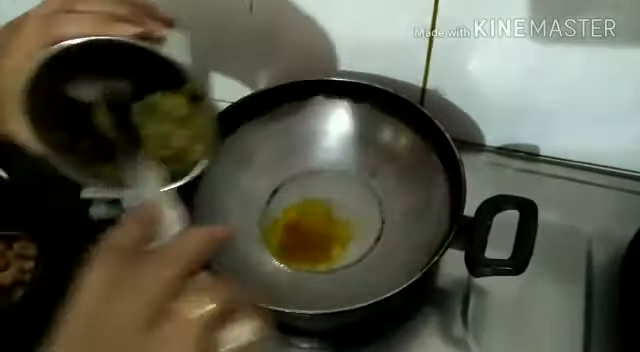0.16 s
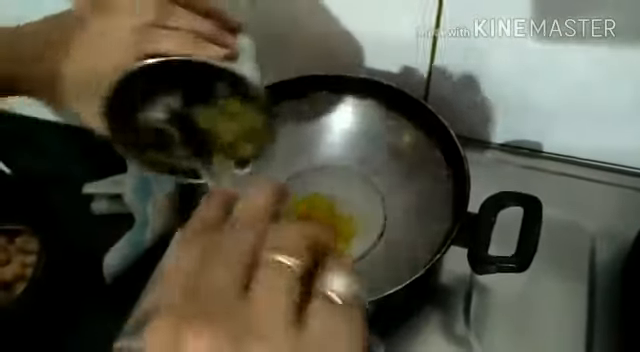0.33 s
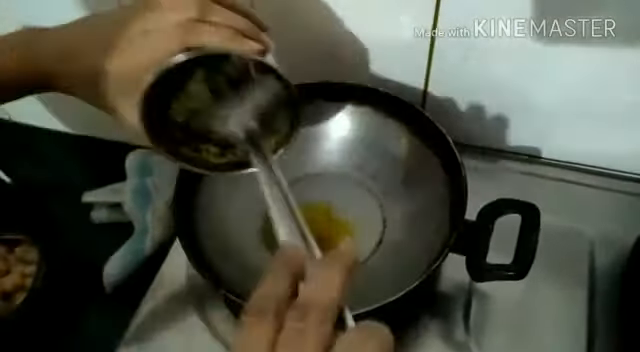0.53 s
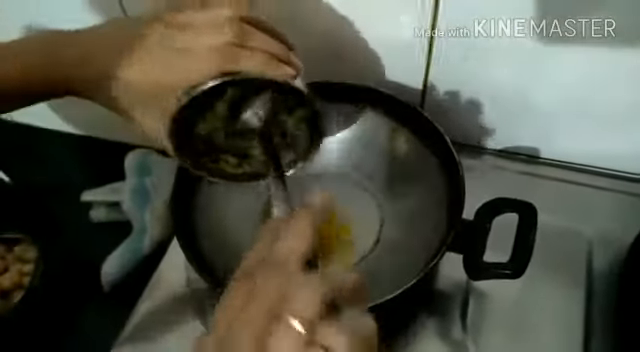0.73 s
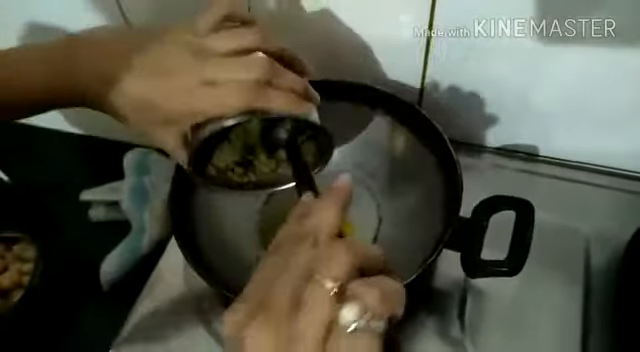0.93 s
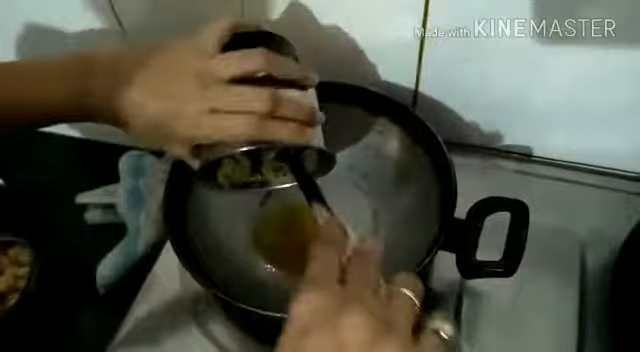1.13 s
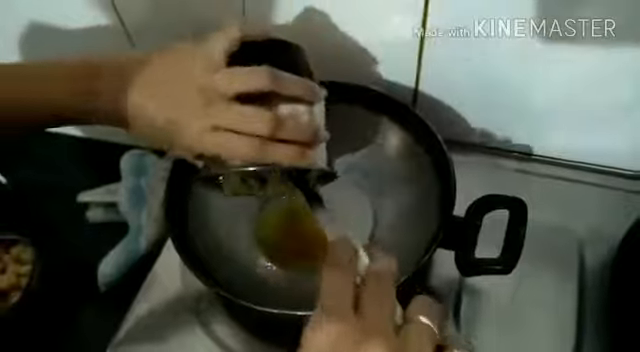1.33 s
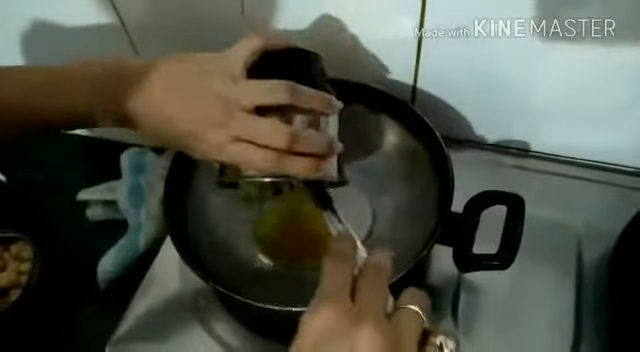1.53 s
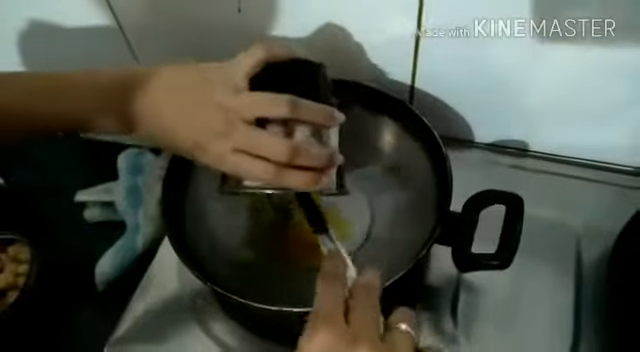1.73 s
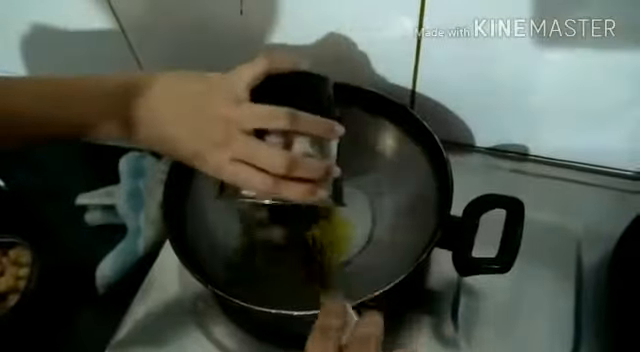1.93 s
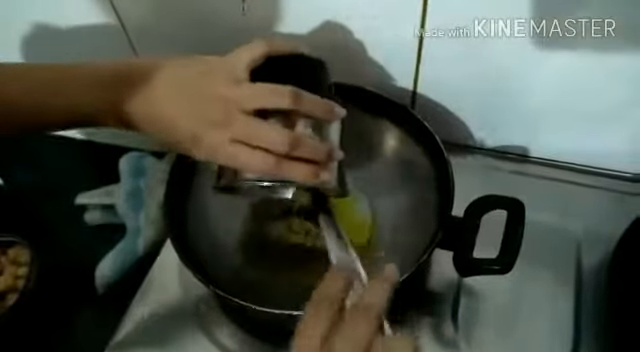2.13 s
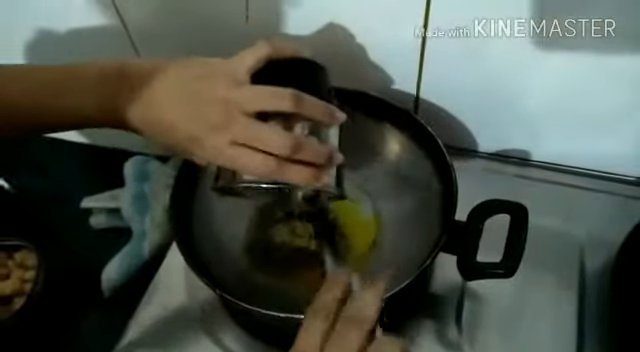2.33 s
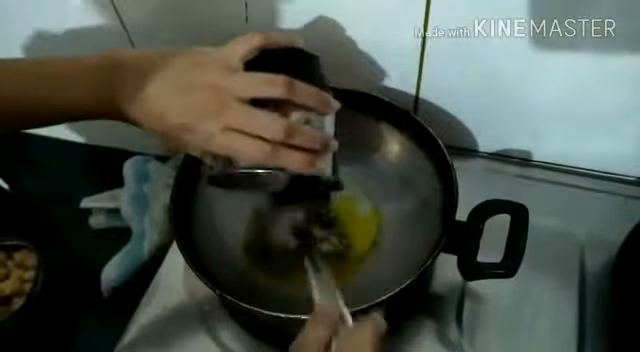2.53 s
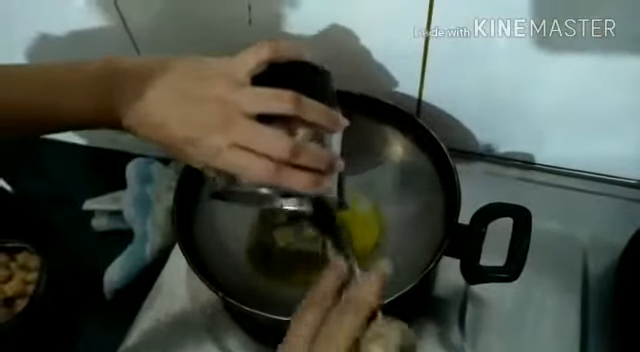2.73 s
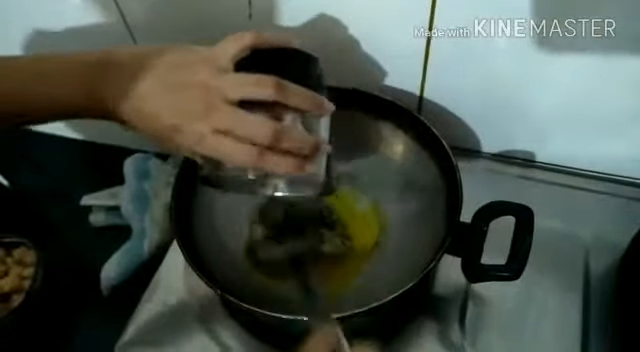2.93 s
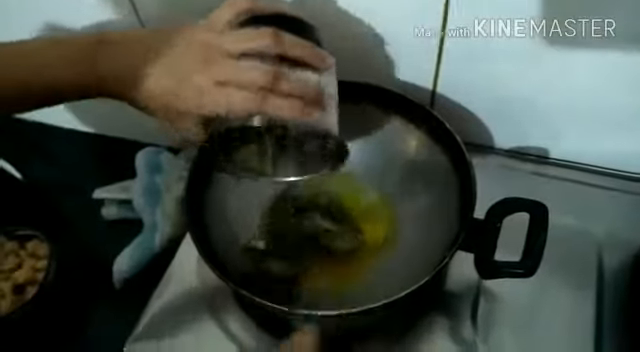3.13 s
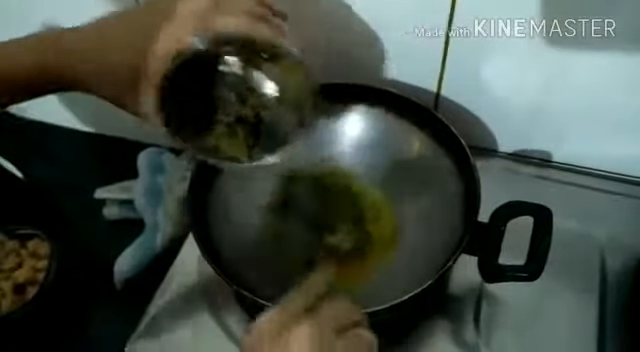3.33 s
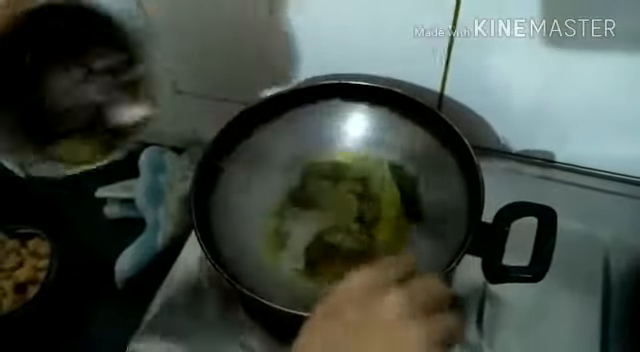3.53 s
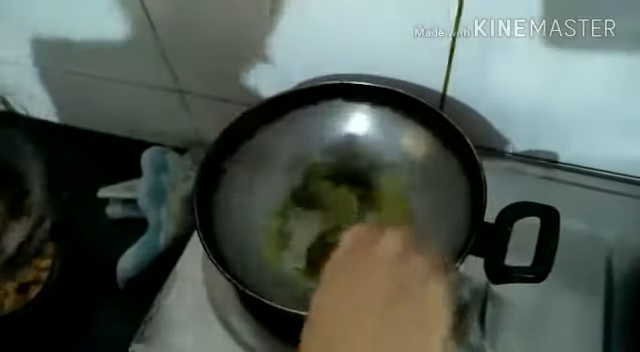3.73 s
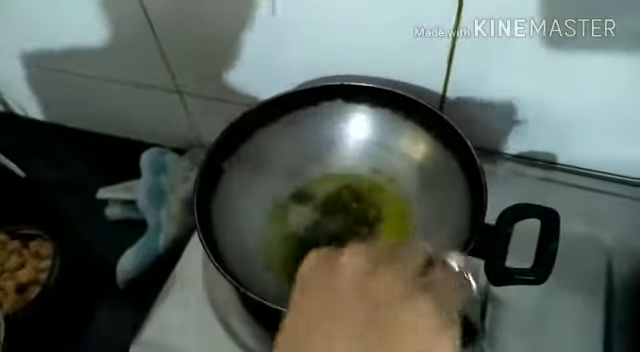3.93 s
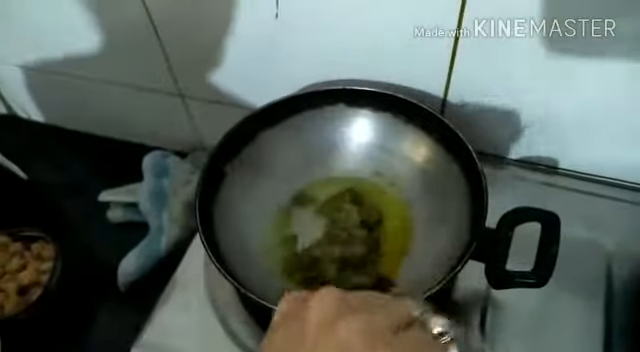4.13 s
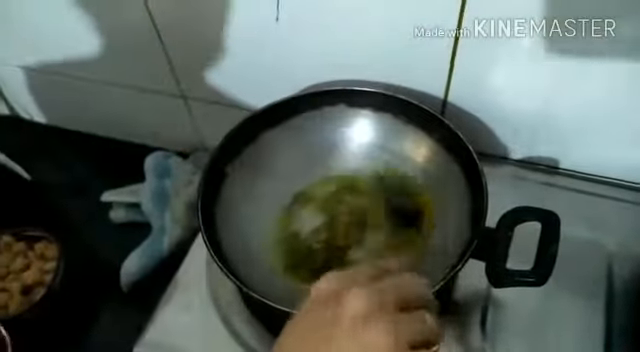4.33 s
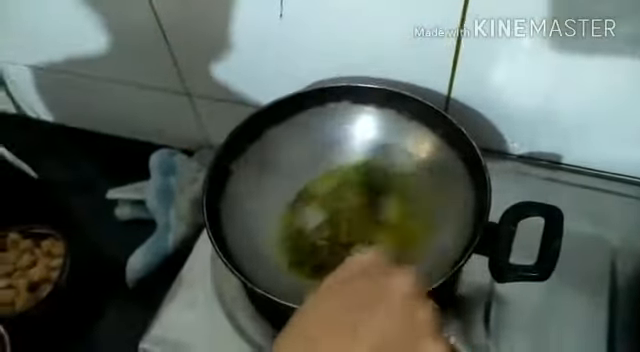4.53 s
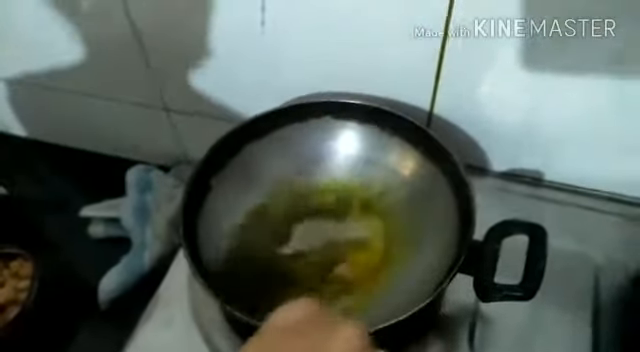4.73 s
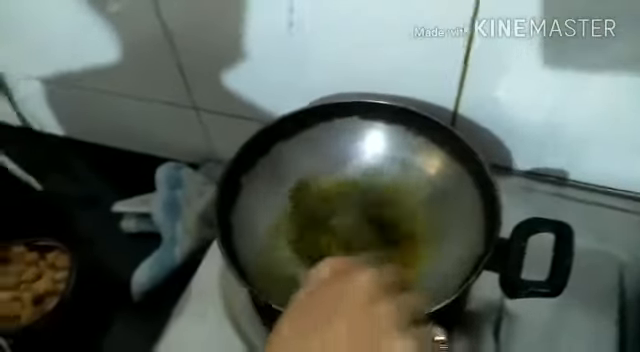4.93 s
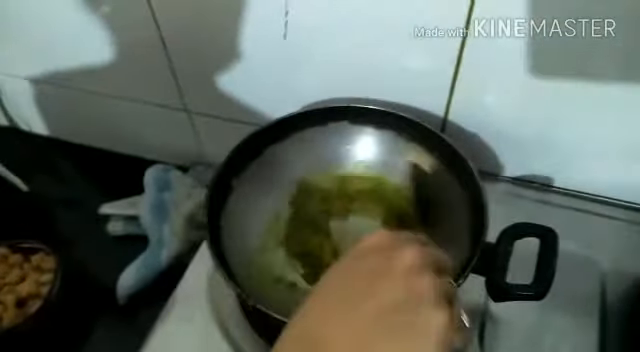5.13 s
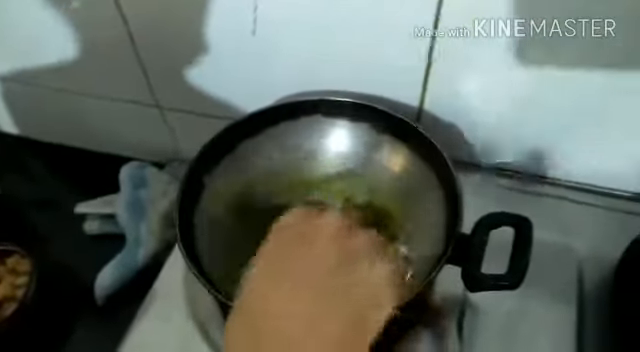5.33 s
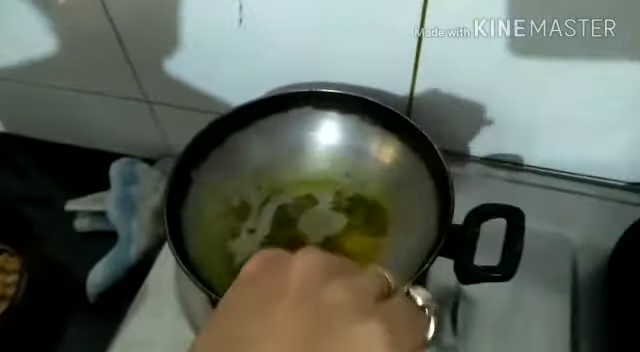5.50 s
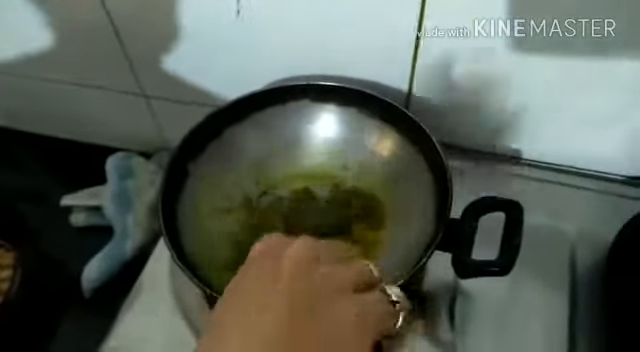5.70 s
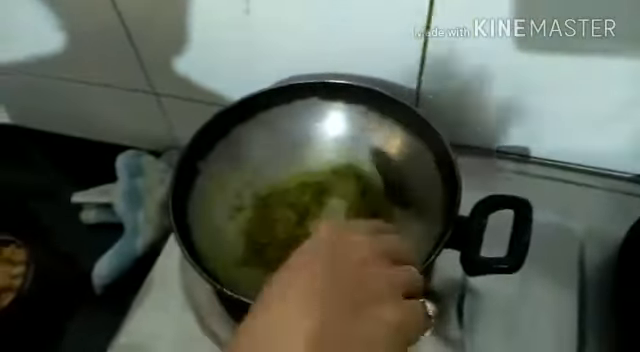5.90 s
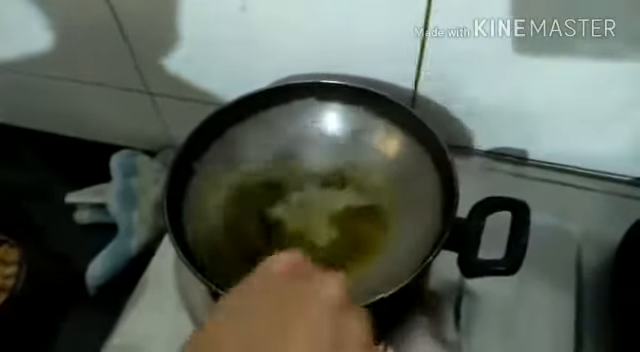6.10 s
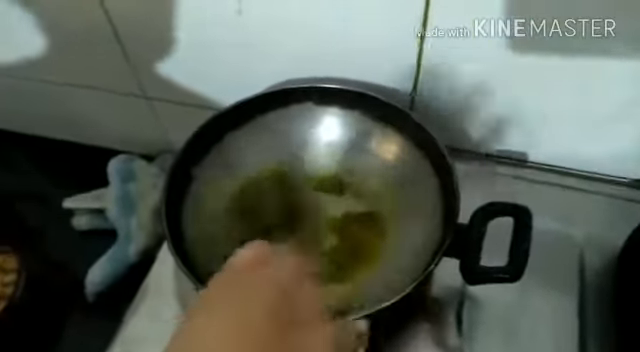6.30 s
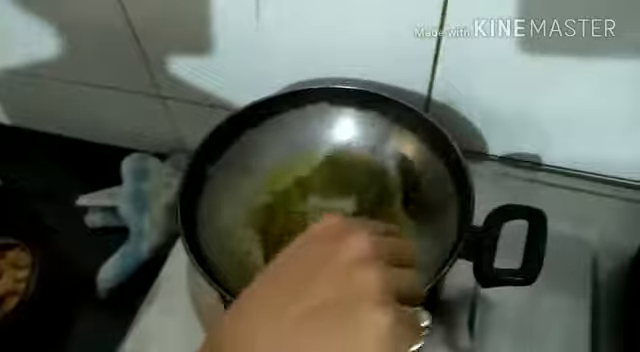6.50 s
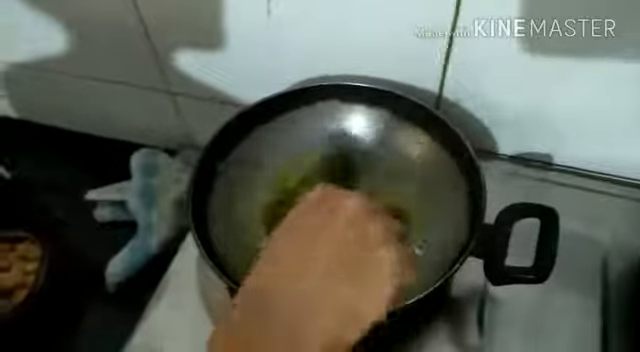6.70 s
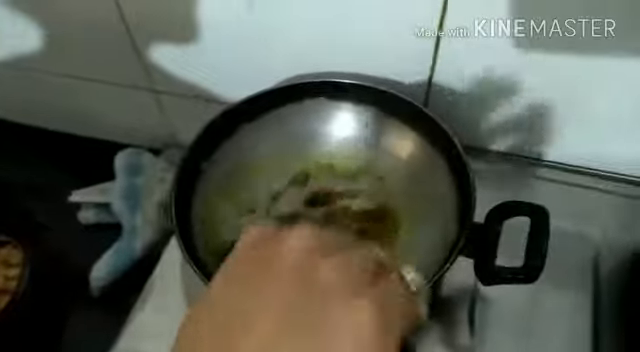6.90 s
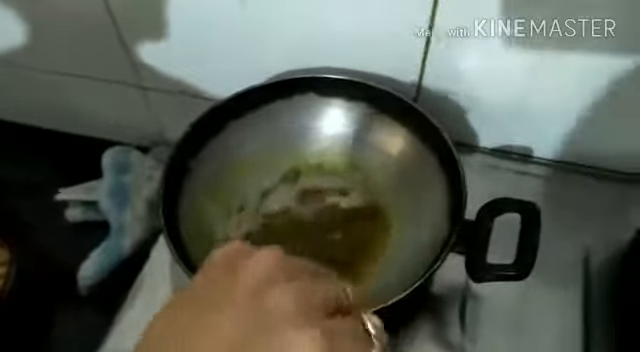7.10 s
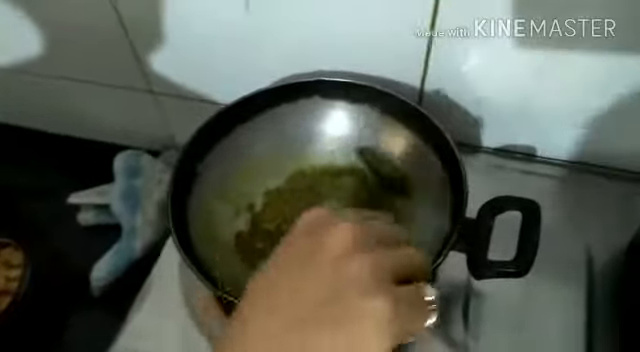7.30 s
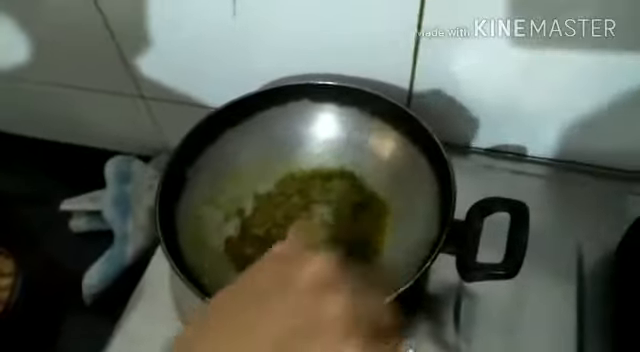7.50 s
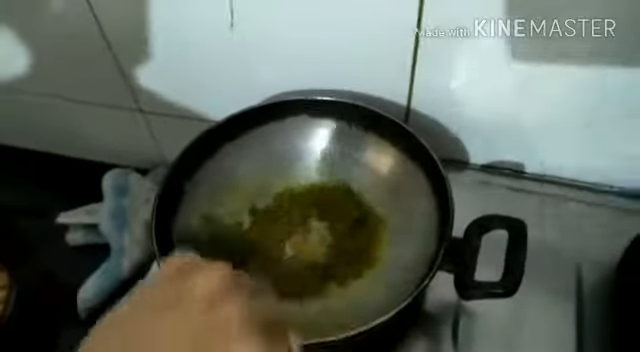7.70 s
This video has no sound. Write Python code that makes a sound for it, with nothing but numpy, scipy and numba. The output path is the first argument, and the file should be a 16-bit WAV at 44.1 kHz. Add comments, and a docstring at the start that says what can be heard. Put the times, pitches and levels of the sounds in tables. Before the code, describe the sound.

In a small tiled kitchen, a spoon squeaks, scrapes and clacks inside a steel cup, with one very loud knock early on. After about two seconds wet paste lands in hot oil and a dense, spitting sizzle starts and stays. Short stirring rubs and hard spoon knocks on the pan run through it. Close phone microphone, mono, with loudness ducking after the hardest blows.

```python
"""First a dull low thud and a soft scrape, then a spoon knocking paste out of a steel cup in a home kitchen.
From about 2 s the wet paste sizzles in hot oil: thousands of random clicks stand for bursting steam bubbles.
Spoon strokes rub along the pan (filtered clicks); knocks are short fading waves, noise and ringing steel modes.
Thuds and air on a phone's single microphone are shaped noise; tiled walls give the knocks a short tail.
The phone's limiter ducks after loud knocks."""
import sys
import numpy as np
from scipy import signal
from scipy.fft import rfft, irfft, next_fast_len
from scipy.io import wavfile
from scipy.ndimage import uniform_filter1d
from numba import njit

SR = 44100
rng = np.random.default_rng(int(sys.argv[2]) if len(sys.argv) > 2 else 0)


def unload_wav(signal):
    """Save mono or channel-first audio to the path in sys.argv[1] as 16-bit WAV at rate SR, clipped to [-1, 1]."""
    wavfile.write(
        sys.argv[1],
        SR,
        np.round(np.clip(np.atleast_2d(signal).T, -1, 1) * 32767).astype(np.int16),
    )


N = 341775  # length in samples


def undb(db):
    """Turns decibels into an amplitude factor."""
    return 10 ** (np.asarray(db) / 20)


def unit(x):
    """Scales x to an rms of 1."""
    return x / np.sqrt(np.mean(x ** 2))


def curves(table):
    """Joins the rows of a table by straight lines: one value per sample for each column after t/s."""
    s, *columns = np.transpose(table)
    return [np.interp(np.arange(N) / SR, s, column) for column in columns]


def colour(x, spectrum):
    """Filters x through points of (f/Hz, level/dB), then sets its rms to 1."""
    hz, db = np.transpose(spectrum)
    size = next_fast_len(N)
    log_hz = np.log(np.arange(size // 2 + 1) * SR / size + 1)
    gain = undb(np.interp(log_hz, np.log(hz), db, -90, -90))
    return unit(irfft(rfft(x, size) * gain, size)[:N])


def walk(rate):
    """A smooth random wander with a spread near 1: random steps, `rate` per second, smoothed twice."""
    hold = int(SR / rate)
    steps = np.repeat(rng.standard_normal(N // hold + 1), hold)
    return 1.3 * uniform_filter1d(uniform_filter1d(steps, hold), hold)[:N]


def bursts(rate, spread_db):
    """Clicks at random moments, `rate` per second, a few much larger than the rest; rms 1."""
    when, size, sign = rng.random((int(rate * N / SR), 3)).T
    clicks = undb(-spread_db * np.log(1 - .98 * size)) * np.sign(sign - .5)
    return unit(np.bincount((when * N).astype(int), clicks, N))


def ring(x, hz, t60):
    """One ringing tone driven by x; it falls 60 dB in t60 seconds, and a click of 1 starts it near level 1."""
    r, w = np.exp(-np.log(1000) / (t60 * SR)), 2 * np.pi * hz / SR
    return signal.lfilter([0, r * np.sin(w)], [1, -2 * r * np.cos(w), r * r], x)


def body(x, modes):
    """All the ringing tones of an object, driven together by x."""
    return sum(undb(db) * ring(x, hz, t60) for hz, db, t60 in modes)


def swells(times, lengths, levels_db, attack_s, fade_db_s):
    """Loudness curve: each event rises, holds until its length is over and fades steadily; powers add up."""
    power = np.zeros(N)
    for s, length, db in zip(times, lengths, levels_db):
        i = int(s * SR)
        t = np.arange(min(N - i, int((length + 50 / fade_db_s) * SR))) / SR
        faded_db = db - fade_db_s * np.clip(t - length, 0, None)
        power[i:i + len(t)] += np.clip(t / attack_s, 0, 1) * undb(2 * faded_db)
    return np.sqrt(power)


WAVER_S = 0.0004  # typical time shift


def drift(x):
    """Reads x a little early or late, so that all its pitches waver together."""
    n = np.arange(len(x))
    return np.interp(n + WAVER_S * SR * walk(25)[:len(x)], n, x)


# Tone of the steady background noise: [f/Hz, level/dB]
QUIET_TONE = [(88, -55), (150, 3), (894, -42), (1150, -1), (1510, -6), (1870, -24), (2270, -19),
              (13000, -20), (15500, -40)]
QUIET_DB = -63


def quiet_noise():
    """A steady faint noise lies under everything: random samples with a fixed tone colour."""
    return undb(QUIET_DB) * colour(rng.standard_normal(N), QUIET_TONE)


HUM_HZ, HUM_DB, HUM_T60_S = 270, -70, 0.44


def room_hum():
    """Noise keeps one resonance ringing: a faint, unsteady tone of the room."""
    return undb(HUM_DB) * unit(ring(rng.standard_normal(N), HUM_HZ, HUM_T60_S))


# Gusts of air on the microphone port: [t/s, length/s, level/dB]
GUSTS = [(0.108, 0.2, -40), (5.214, 0.3, -20), (6.18, 0.087, -54), (6.85, 0.25, -65), (7.254, 0.59, -51)]
# Tone of the moving air: [f/Hz, level/dB]
AIR_TONE = [(8.8, -30), (20, 6), (45, -22), (70, 1), (91, -7), (150, -120)]
GUST_ATTACK_S, GUST_FADE_DB_S, STILL_AIR_DB = 0.041, 40, -71


def air_on_microphone():
    """Air pushes unevenly on the microphone port: deep noise that swells with each gust."""
    gusts = swells(*np.transpose(GUSTS), GUST_ATTACK_S, GUST_FADE_DB_S)
    return colour(rng.standard_normal(N), AIR_TONE) * (gusts + undb(STILL_AIR_DB))


# Dull thuds near 100 Hz: [t/s, length/s, level/dB]
THUDS = [(0.0, 0.31, -37), (0.675, 0.046, -40.5), (0.962, .02, -49), (1.084, 0.043, -42), (1.4, 0.072, -53),
         (1.7, 0.066, -58), (2.1, 0.026, -39.5), (2.28, 0.045, -54), (2.554, 0.055, -45),
         (2.912, 0.039, -49), (3.092, 0.029, -52), (3.298, 0.084, -52.5), (3.686, 0.054, -48),
         (4.058, 0.035, -46), (4.2, 0.083, -39.5), (4.666, .05, -48), (4.77, 0.059, -46), (5.026, .04, -45),
         (7.342, 0.18, -42)]
# Spoon strokes on the pan bottom, also used by stirring():
# [t/s, length/s, level of the lower rub/dB, level of the upper rub/dB, level of the boom/dB]
STROKES = [(3.469, 0.079, -37, -26.5, -39), (3.908, 0.042, -35, -43, -41), (4.008, 0.15, -48, -37.5, -57),
           (4.382, 0.037, -50, -35, -62), (4.503, 0.083, -77, -39.5, -71), (4.72, 0.13, -32, -32.5, -43),
           (5.074, 0.18, -43, -38, -43), (5.204, 0.32, -28.5, -31, -21.5), (5.266, 0.27, -38.5, -14, -36),
           (5.56, 0.23, -39, -27, -33), (5.913, 0.059, -34.5, -29.5, -30.5), (6.178, 0.11, -26, -27, -31.5),
           (6.495, 0.089, -35.5, -44, -44), (6.839, .19, -34.5, -32.5, -35.5),
           (7.225, 0.2, -48.5, -40, -32.5), (7.663, 0.16, -29.5, -31, -32)]
# Tone of the low noise: [f/Hz, level/dB]
DRONE_TONE = [(35, -29), (60, -51), (92, 5), (150, 13), (178, -10), (190, -63), (250, -43), (420, -120)]
# The two low tones in it: [f/Hz, level/dB, time to fall 60 dB/s]
DRONE_MODES = [(84, -13, 0.43), (111.3, 4, 0.48)]
THUD_ATTACK_S, THUD_FADE_DB_S, DRONE_DB = 0.0098, 126, -69
STROKE_ATTACK_S, STROKE_FADE_DB_S, BOOM_FADE_DB_S = 0.01, 161, 60


def low_drone():
    """Thuds and strokes wake a drone: low noise mixed with two low tones that the same noise drives."""
    air = rng.standard_normal(N)
    s, length, _, _, boom_db = np.transpose(STROKES)
    thuds = swells(*np.transpose(THUDS), THUD_ATTACK_S, THUD_FADE_DB_S)
    booms = swells(s, length, boom_db, STROKE_ATTACK_S, BOOM_FADE_DB_S)
    drone = 0.6 * colour(air, DRONE_TONE) + 0.63 * unit(body(air, DRONE_MODES))
    return drone * (thuds + booms + undb(DRONE_DB))


# Tone of the lower and the upper part of the rubbing: [f/Hz, level/dB]
RUB_LOWER = [(88, -27), (150, -10.5), (253, 2.5), (307, -10.5), (350, -0.5), (460, -28), (770, -120)]
RUB_UPPER = [(200, -40), (340, -19), (374, -8), (595, 1.5), (680, -3.5), (880, -45), (1500, -120)]
# Ringing of pan and stove top, lower and upper: [f/Hz, level/dB, time to fall 60 dB/s]
STOVE_LOWER = [(194, 7, 0.14), (246.5, -7, 0.39), (342, -31, 0.24)]
STOVE_UPPER = [(461, 6, 0.39), (538, -16, 0.98)]


def stirring():
    """The spoon judders over the pan bottom as many small clicks; pan and stove top boom along."""
    s, length, lower_db, upper_db, _ = np.transpose(STROKES)
    judder = bursts(2500, 0.94) * undb(1.6 * walk(40))
    lower = 1.15 * colour(judder, RUB_LOWER) + 0.19 * unit(body(judder, STOVE_LOWER))
    upper = 0.54 * colour(judder, RUB_UPPER) + 0.17 * unit(body(judder, STOVE_UPPER))
    lower_gain = swells(s, length, lower_db, STROKE_ATTACK_S, STROKE_FADE_DB_S)
    upper_gain = swells(s, length, upper_db, STROKE_ATTACK_S, STROKE_FADE_DB_S)
    return lower_gain * lower + upper_gain * upper


def bubbles(count=28):
    """Larger bubbles ring for some cycles, each size at its own pitch; power is even per Hz."""
    pitch_hz = np.geomspace(480, 7000, count) * (1 + 0.027 * rng.standard_normal(count))
    return unit(sum(np.sqrt(hz) * unit(ring(bursts(45, 0.99), hz, 45 / hz)) for hz in pitch_hz))


# Course of the frying: [t/s, overall level/dB, extra level of the fine spray/dB,
# extra level of the deep bubbling/dB]; the first row is when the paste lands
FRYING = [(1.935, -58, -2, -12), (1.955, -29.5, -4, -26), (2.06, -30, 2, -10), (2.55, -25, 3.5, -5.5),
          (3.12, -24, 3, -9.5), (3.4, -26, 2.5, -8.5), (3.8, -24, 1, -9), (4.01, -25, 1, -6.5),
          (4.35, -22.5, 0, -12), (4.95, -22.5, 1, -11), (5.2, -25, 2, -3.5), (5.4, -19, -2, 3),
          (5.74, -24, 3.5, -5.5), (5.95, -20, -0.5, -12), (6.3, -21.5, -1, -9.5), (7.0, -23.5, 0.5, -10),
          (7.3, -24.5, -0.5, -9), (7.75, -21.5, -3, -11.5)]
# Tones of deep bubbling, middle sizzle and fine spray: [f/Hz, level/dB]
BUBBLING_TONE = [(260, -39), (450, -30), (517, -28.5), (753, -6.5), (961, -7.5), (1020, -7), (1350, -6),
                 (1760, -16.5), (2970, -120)]
SIZZLE_TONE = [(680, -44), (1150, -20), (1430, 1.5), (1730, 2.5), (1870, 4.5), (2120, 4), (2650, -1.5),
               (2890, -6.5), (4200, -15.5), (5460, -14.5), (9240, -120)]
SPRAY_TONE = [(2240, -2), (3800, -4.5), (4540, -5), (5320, -1.5), (6090, -5), (6770, -11), (7900, -12.5),
              (10700, -7.5), (13000, -1.5), (13800, -5), (15600, -13.5)]
# Ringing of the pan: [f/Hz, level/dB, time to fall 60 dB/s]
PAN = [(607.5, 10, 0.091), (837, -1, 0.47), (916, -6, 0.13), (1075, -1.5, 0.47), (1454, -4, 0.16),
       (1765, 0.5, 0.11), (2235, -0.5, 0.31), (2692, -1.5, 0.32)]
PASTE_LANDS_S = FRYING[0][0]


def frying():
    """Steam bubbles burst and shake the pan; deep, middle and spray flicker alone and surge together."""
    level_db, spray_db, deep_db = curves(FRYING)
    pops = bursts(9000, 1.5) + 0.33 * bubbles()
    shaken = pops + 0.21 * unit(body(pops, PAN))
    surge_db = 0.56 * walk(17)
    deep = colour(shaken + 0.5 * bursts(4000, 0.49), BUBBLING_TONE)
    deep = deep * undb(deep_db + 2.5 * walk(20))
    middle = colour(shaken, SIZZLE_TONE) * undb(0.19 * walk(28))
    spray = colour(pops + bursts(12000, 3.1), SPRAY_TONE)
    spray = spray * undb(spray_db + 0.6 * walk(30))
    landed = np.arange(N) > PASTE_LANDS_S * SR
    return undb(level_db + surge_db) * (deep + middle + spray) * landed


# The spoon edge squeaks into the paste: [t/s, f/Hz, level/dB]
SQUEAK = [(.16, 2250, -69), (.22, 2210, -64), (.245, 2600, -49), (.28, 2200, -27), (.31, 2034, -29),
          (.36, 1800, -62)]
SQUEAK_WIDTH_HZ = 300


def squeak():
    """Friction makes a narrow band of noise whose pitch jumps up briefly, then falls."""
    hz, db = curves(SQUEAK)
    t = np.arange(N) / SR
    rough = unit(uniform_filter1d(bursts(900, 3), int(SR / 2 / SQUEAK_WIDTH_HZ)))
    tone = np.sin(2 * np.pi * np.cumsum(hz) / SR)
    return undb(db) * rough * tone * (t > SQUEAK[0][0]) * (t < SQUEAK[-1][0])


# Ringing of the steel, also used by knocks(): [f/Hz, level/dB, basic time to fall 60 dB/s]
STEEL = [(625, -13.5, 0.34), (764, -4, 0.15), (1078.4, -6, 0.22), (1506, -5.5, 0.047), (1315, -6, 0.1),
         (1732, -5.5, 0.08), (1800, -7, 0.041), (1938, -11.5, 0.13), (2018, -12.5, 0.3), (2216, -12, 0.078),
         (2553, -13, 0.05), (2760, -9.5, 0.039), (3120, -16, 0.1), (3345, -13, 0.1), (4100, -16, 0.088),
         (5560, -12, 0.068)]
# Spoon dragged through the cup: [t/s, level of the body/dB, level of the edge/dB, level of the hiss/dB]
SCRAPE = [(0.0, -64, -53, -62), (0.22, -52, -64, -55), (0.42, -41, -55, -54.5), (0.5, -21, -38, -41),
          (0.66, -42, -70, -63), (0.88, -52, -40, -48.5), (1.02, -46.5, -64, -61), (1.26, -50, -36.5, -58),
          (1.51, -41.5, -46, -74), (1.776, -55, -89, -51), (1.89, -40, -37, -57), (1.95, -44.5, -54, -81)]
# Tones of body, edge and hiss: [f/Hz, level/dB]
SCRAPE_BODY = [(260, -58), (450, -55), (560, -6), (932, -20), (1080, 6.5), (1400, -24), (1520, -44),
               (1850, -25), (2100, -24), (2730, -58), (4620, -120)]
SCRAPE_EDGE = [(1120, -2), (1900, 11), (2040, -15), (2300, -7), (3020, -2), (3270, -12), (4600, -39),
               (5980, -59), (10100, -120)]
SCRAPE_HISS = [(4000, -30), (4700, -0.5), (5300, -1.5), (6300, -13), (7500, -21.5), (10500, -14),
               (13000, -8), (15500, -20)]
# The lowest tone of the cup hums along: [t/s, length/s, level/dB]
CUP_HUMS = [(0.685, 0.089, -52), (1.05, 0.23, -57), (1.456, 0.039, -58), (1.7, 0.13, -50)]
CUP_ATTACK_S, CUP_FADE_DB_S = 0.014, 200
SONG_SPREAD_DB = 8  # how far each steel tone swells and sinks


def scrape():
    """The spoon sticks and slips as fine grit; steel tones sing up at their own moments under a thin hiss."""
    n = int(SCRAPE[-1][0] * SR)
    body_db, edge_db, hiss_db = (c[:n] for c in curves(SCRAPE))
    grit = bursts(2000, 3.0) * undb(3.5 * walk(30))
    rubbing = rng.standard_normal(n)
    # the spoon slides across the wall, so each tone is driven at its own moments
    low_songs, high_songs = np.zeros((2, n))
    for hz, db, t60 in STEEL:
        song = ring(rubbing, hz, t60 * min(1, 1300 / hz))  # high tones die sooner
        song = undb(db + SONG_SPREAD_DB * walk(13.78)[:n]) * song
        if hz < 2000:
            low_songs += song
        else:
            high_songs += song
    low = 0.5 * colour(grit, SCRAPE_BODY)[:n] + 0.27 * unit(drift(low_songs))
    edge = 0.38 * colour(grit, SCRAPE_EDGE)[:n] + 0.26 * unit(drift(high_songs))
    hiss = colour(grit + 2.3 * rng.standard_normal(N), SCRAPE_HISS)[:n] * undb(3.5 * walk(16)[:n])
    hum_gain = swells(*np.transpose(CUP_HUMS), CUP_ATTACK_S, CUP_FADE_DB_S)[:n]
    hums = hum_gain * unit(ring(rubbing, STEEL[0][0], 0.2))
    mix = undb(body_db) * low + undb(edge_db) * edge + undb(hiss_db) * hiss + hums
    return np.pad(mix, (0, N - n))


# Spoon knocks on cup and pan: [t/s, level/dB, f/Hz, fade time/ms (at least 0.4 is used),
# relative level of clatter/dB, of tick/dB, of ringing steel/dB]
KNOCKS = [(0.13, -39.5, 1204, 8.2, -28, -30, -15), (0.26, -33, 2530, 6, -20, -30, -10),
          (0.281, -19, 2330, 2.4, -8, -11, -6), (0.295, -30, 2150, 4, 6, -26, -9),
          (0.318, -17.5, 1260, 2.5, -4.5, -35, -13.5), (0.326, -12.5, 1230, 2.6, -6, -23, -14),
          (0.339, -23, 1210, 3, -14, -19, -12), (0.351, -23, 1070, 3.3, -17, -37, -6),
          (0.45, 10, 1240, 2.5, -21, -23, -15), (0.549, -26.5, 1890, 5, 0, -15, -7),
          (0.56, -11, 1800, 4.5, -7.5, -17, -9), (0.578, -9.5, 1150, 6, -12, -23, -21),
          (0.814, -37, 1990, 4, 2.5, 13.5, 0), (0.882, -21.5, 1120, 4, -3, -9, -26),
          (0.898, -19, 1060, 3, -11, -22, -14.5), (1.023, -25.5, 1194, 4.3, -8.5, -11, -21),
          (1.127, -30.5, 1290, 4, -7, -7, -11), (1.148, -33, 1190, 5.1, -2, -7, -9),
          (1.249, -34, 1240, 6, -7, -20, -11), (1.256, -24, 1160, 4.1, -10, -31, -8.5),
          (1.266, -18.5, 1250, 3.4, -18, -25, -23), (1.384, -30, 1260, 5, -12, -23, -4),
          (1.462, -28.5, 1190, 4.6, -7, -14, -3), (1.518, -40, 1920, 4, 4.5, 1.5, -17),
          (1.677, -2, 1240, 2.5, -2, -14.5, -10), (2.494, -14, 1480, 2.4, -3.5, -19, -5),
          (2.497, -20, 795, 9.2, -18, -25, -13), (2.6245, -3.5, 1300, 1.4, -14, -20, -8),
          (2.628, -10, 1986, 9.4, -20, -25, -8), (2.629, -16, 810, 10.4, -23, -25, -12),
          (3.143, -16, 1170, 3, -3, -20, -8), (3.158, -23.5, 1054, 46, -41, -28, -26),
          (3.4749, 4.5, 2500, 2, -7.5, -6, -5), (3.4803, -2.5, 2600, 1.5, -12, -20, -12),
          (3.484, 0, 1890, 2.2, -12, -13, -3), (4.069, -18.5, 866, 4.4, -4, -12, -7),
          (4.3826, 0.5, 2170, 0.85, -14, -10.5, -10), (4.721, 1.5, 1040, 1.2, -16, -35, -9.5),
          (4.734, -1.5, 925, 2.9, -27, -32, -15), (4.748, -3, 985, 3.6, -16, -23, -1),
          (5.087, 1, 2315, 0.98, -12, -20, -14), (5.09, -5.5, 1490, 3, -12, -22, -10),
          (5.509, -6, 1410, 3.6, -3.5, -25, -3.5), (5.569, -6.5, 1330, 4.3, -15, -25, -3.5),
          (5.599, -13, 1360, 4.4, -17, -27, -16), (5.926, -12, 880, 3.9, -13, -33, 8),
          (6.853, -17.5, 2350, 2.5, 0, 0, -6), (6.862, -12, 1530, 3.4, 1, -1, -7),
          (7.019, -12.5, 1590, 5.3, -20.5, -16, 2), (7.667, -13.5, 1850, 3, -14, -6, 5)]
CONTACT_S, SOFTENING = 0.00017, 0.53  # rise of a full blow; weaker blows rise more slowly (dB per dB)
THUMP_DB, THUMP_GROWTH, THUMP_S = -22.5, 1.2, 0.00016  # air push; grows faster than the blow
PASTE_DAMPING = 0.25  # share of the ring time left once the paste is in the pan
WAVER_DB = 6  # hand and paste shift on the steel, so each tone flutters


def band_filter(order, edges_hz, kind="band"):
    """A filter that lets through the given pitch range."""
    return signal.butter(order, edges_hz, kind, fs=SR, output="sos")


def knocks():
    """Each blow gives a short fading wave, clatter, a hard tick and a push of air; the steel rings on."""
    hits, blows, thumps = np.zeros((3, N))
    t = np.arange(3000) / SR
    middle, shrill = band_filter(2, [1450, 3700]), band_filter(1, [4900, 6200])
    high = band_filter(2, 4500, "high")
    for s, db, hz, fade_ms, clatter_db, tick_db, ring_db in KNOCKS:
        i = int(s * SR)
        noise, chatter = rng.standard_normal((2, len(t)))
        rise = 1 - np.exp(-t / (CONTACT_S * undb(-SOFTENING * min(db, 0))))
        clack = 1.3 * np.exp(-1000 * t / max(fade_ms, 0.4)) * np.sin(2 * np.pi * hz * t)
        clatter_fade = np.exp(-t / 0.0044) + 0.16 * np.exp(-t / 0.023)
        clatter = 2.6 * undb(clatter_db) * clatter_fade * signal.sosfilt(middle, noise)
        bright = signal.sosfilt(high, noise) + 2.0 * signal.sosfilt(shrill, noise)
        tick = 1.18 * undb(tick_db) * np.exp(-t / 0.0036) * bright
        hits[i:i + len(t)] += (undb(db) * rise * (clack + clatter + tick))[:N - i]
        push = t / THUMP_S * np.exp(1 - t / THUMP_S)
        thumps[i:i + len(t)] += (undb(THUMP_GROWTH * db + THUMP_DB) * push)[:N - i]
        # the spoon chatters on after contact: this blurs the tones; those near the blow's pitch ring most
        near = band_filter(2, [hz / 1.4, hz * 2.16])
        drive = signal.sosfilt(near, chatter) + 2.5 * undb(clatter_db) * signal.sosfilt(middle, chatter)
        blows[i:i + len(t)] += (undb(db + ring_db) * rise * np.exp(-t / 0.0068) * drive / 21)[:N - i]
    wet = int(PASTE_LANDS_S * SR)
    rings = np.zeros(N)
    for hz, db, t60 in STEEL:
        before = ring(blows[:wet], hz, t60)
        after = ring(blows[wet:], hz, t60 * PASTE_DAMPING)
        rings += undb(db + WAVER_DB * walk(45)) * np.concatenate([before, after])
    # small steelware gives off little bass
    return signal.sosfilt(band_filter(2, 480, "high"), hits + drift(rings)) + thumps


# Echo of the tiled walls, band by band: [f/Hz, time to fall 60 dB/s]
TILES = [(400, 0.1), (1200, 0.26), (3000, 0.31), (7000, 0.11), (13000, 0.044)]
TAIL_DB = -7


def kitchen(x):
    """Walls send back dense reflections: noise that dies away at its own rate in each band."""
    t = np.arange(SR // 2) / SR
    tail = np.zeros(len(t))
    for hz, t60 in TILES:
        noise = signal.sosfilt(band_filter(1, [hz / 1.94, hz * 1.67]), rng.standard_normal(len(t)))
        tail += noise * np.exp(-np.log(1000) * t / t60)
    tail = tail * (1 - np.exp(-t / 0.0018))
    return undb(TAIL_DB) * signal.fftconvolve(x, tail / np.sqrt(np.sum(tail ** 2)))[:N]


def scene():
    """Adds all sources, with the wall echo on the knocks; both channels are the same."""
    spoon = knocks()
    background = quiet_noise() + room_hum() + air_on_microphone() + low_drone()
    mono = background + stirring() + frying() + squeak() + scrape() + spoon + kitchen(spoon)
    return np.array([mono, mono])


LIMIT_DB, GRIP_S, RECOVER_S = -10, 0.0013, 0.34
TOP_HZ = 15660  # upper end of the pitch range


@njit
def recover(need_db, grip, keep):
    """The limiter's cut deepens within milliseconds and eases off slowly."""
    out, now = np.empty(len(need_db)), 0.
    for i in range(len(need_db)):
        if need_db[i] < now:
            now = now + grip * (need_db[i] - now)
        else:
            now = now * keep
        out[i] = now
    return out


def record(dry):
    """The phone's limiter ducks just after loud blows and recovers slowly; peaks are rounded, the top is cut."""
    loud_db = 10 * np.log10(2 * uniform_filter1d(dry[0] ** 2, 88) + 1e-12)  # over 2 ms
    need_db = np.minimum(LIMIT_DB - loud_db, 0)
    cut_db = recover(need_db, 1 / (GRIP_S * SR), np.exp(-1 / (RECOVER_S * SR)))
    rounded = np.tanh(1.17 * dry * undb(cut_db)) / 1.173
    return signal.sosfilt(signal.ellip(12, .2, 90, TOP_HZ, fs=SR, output="sos"), rounded)


dry = scene()
out = record(dry)
unload_wav(out)
```